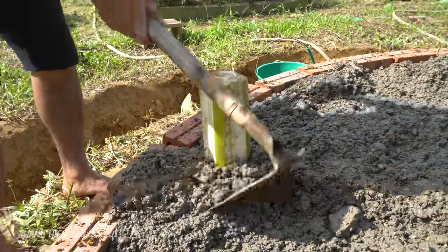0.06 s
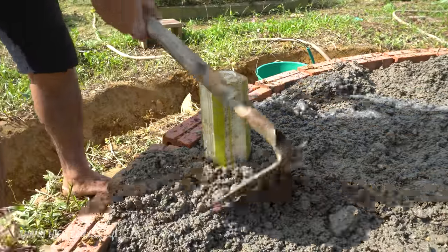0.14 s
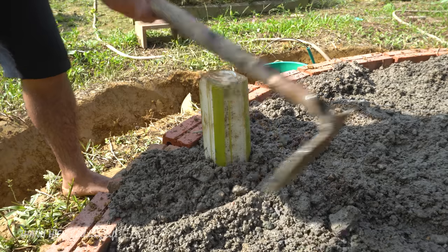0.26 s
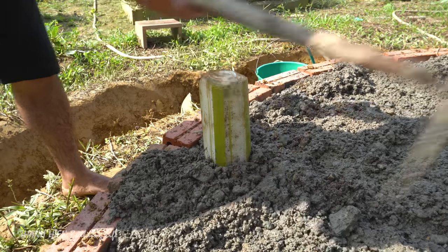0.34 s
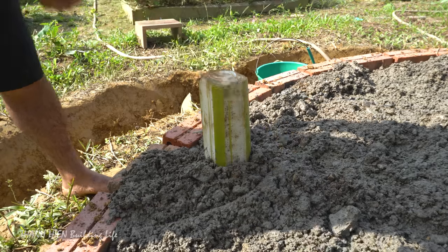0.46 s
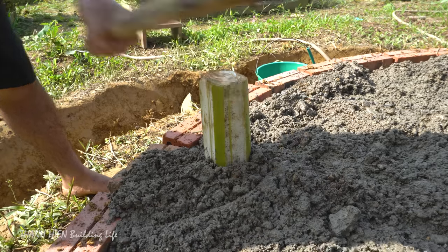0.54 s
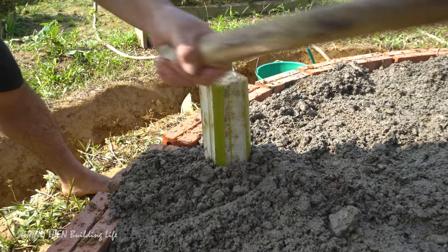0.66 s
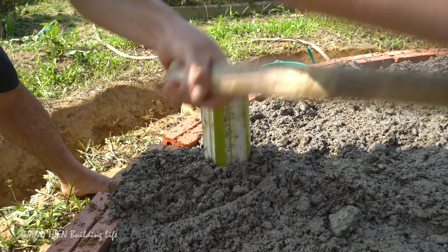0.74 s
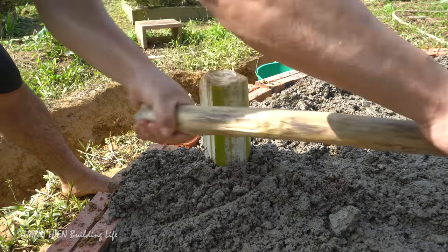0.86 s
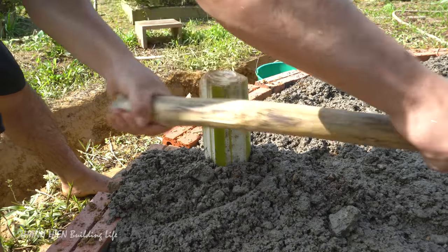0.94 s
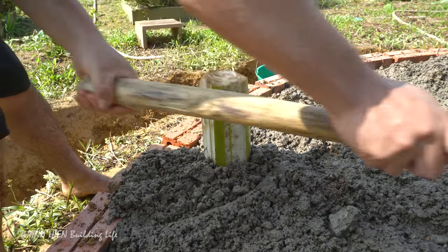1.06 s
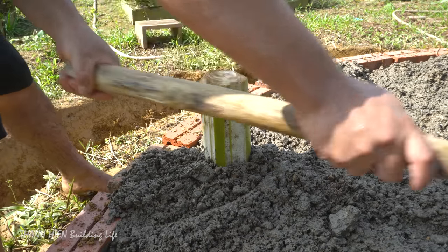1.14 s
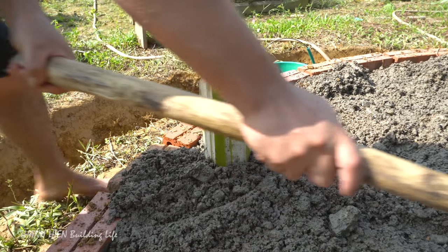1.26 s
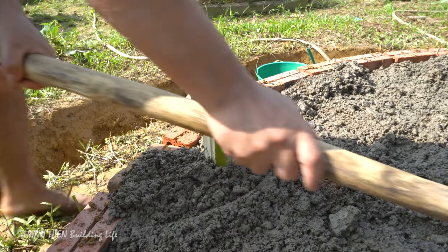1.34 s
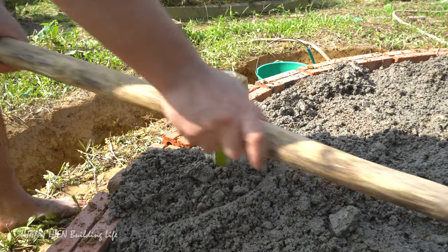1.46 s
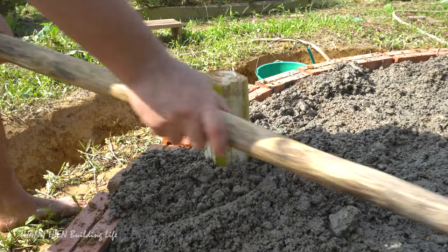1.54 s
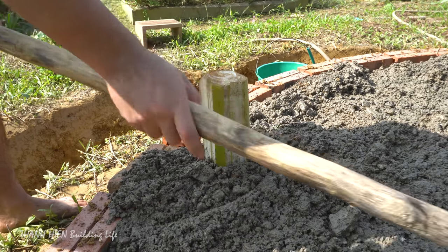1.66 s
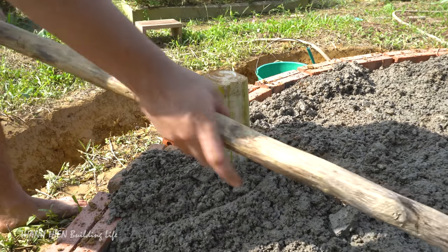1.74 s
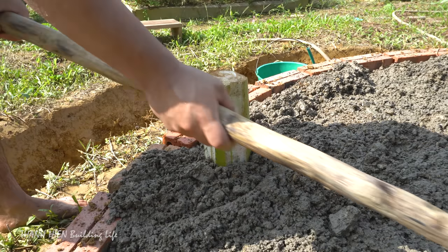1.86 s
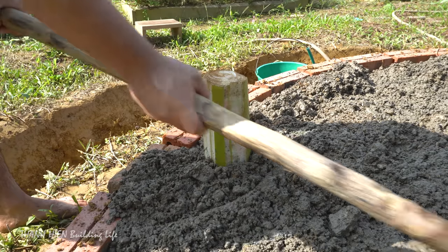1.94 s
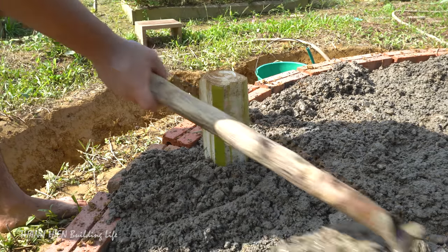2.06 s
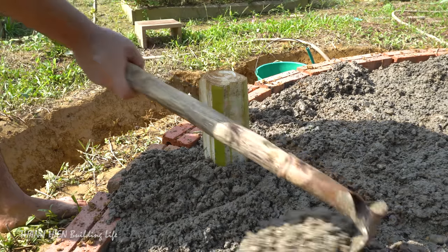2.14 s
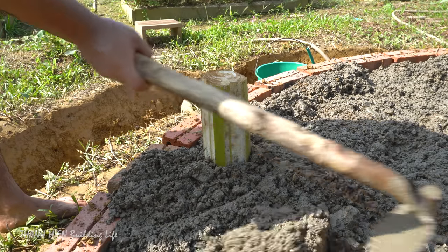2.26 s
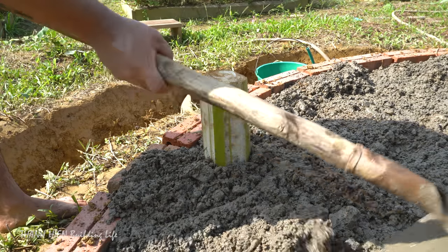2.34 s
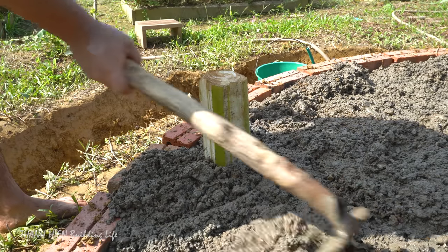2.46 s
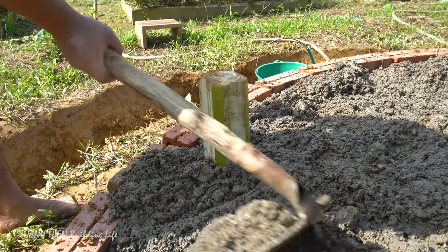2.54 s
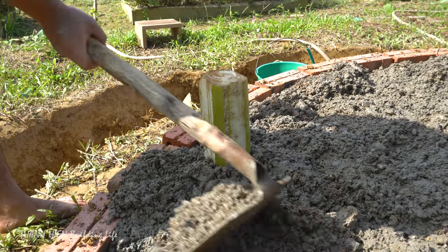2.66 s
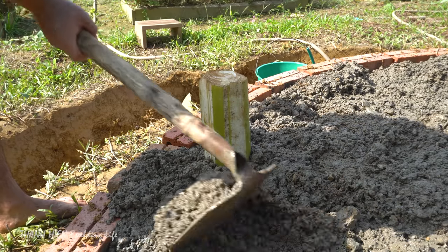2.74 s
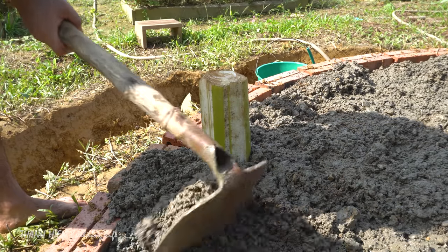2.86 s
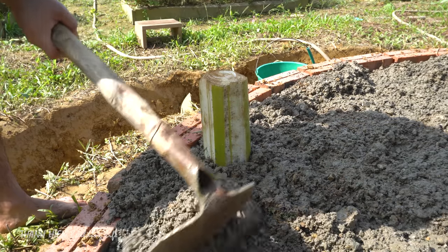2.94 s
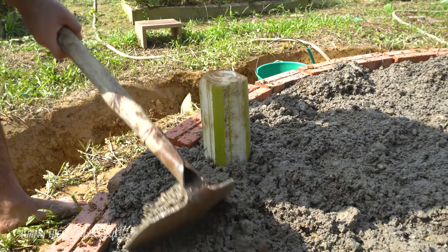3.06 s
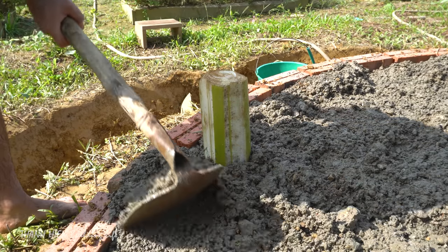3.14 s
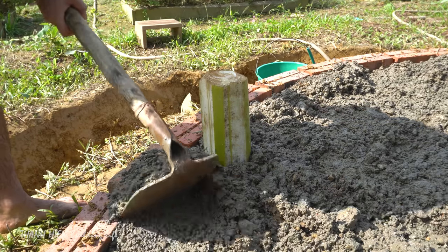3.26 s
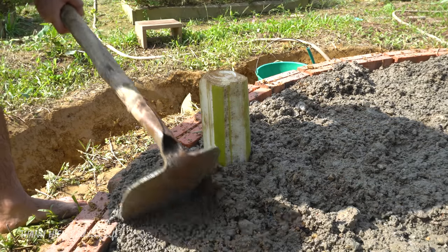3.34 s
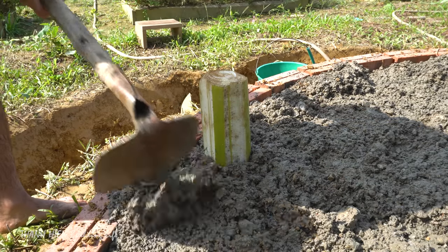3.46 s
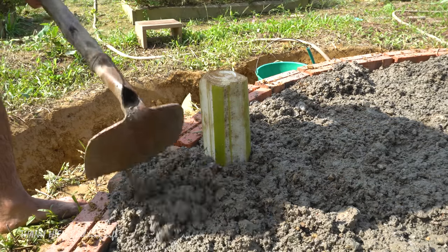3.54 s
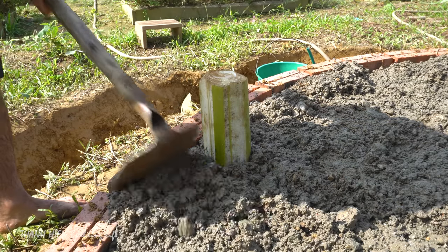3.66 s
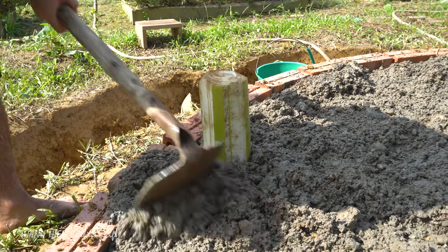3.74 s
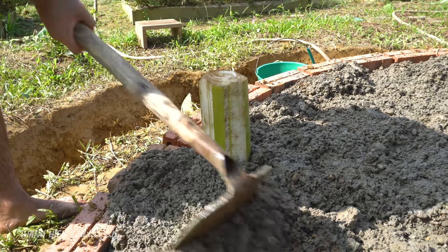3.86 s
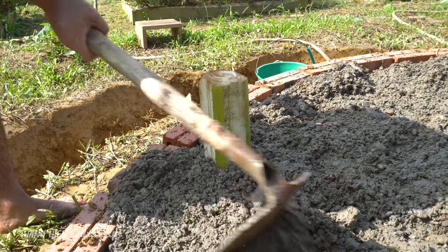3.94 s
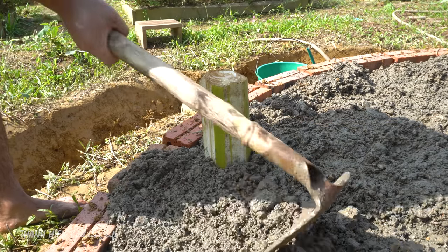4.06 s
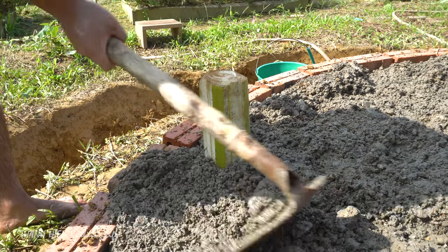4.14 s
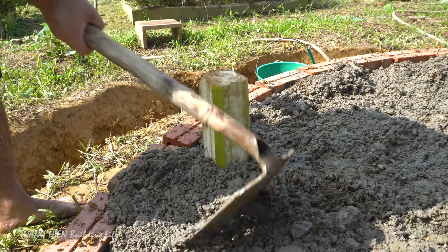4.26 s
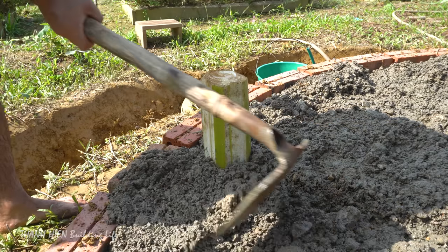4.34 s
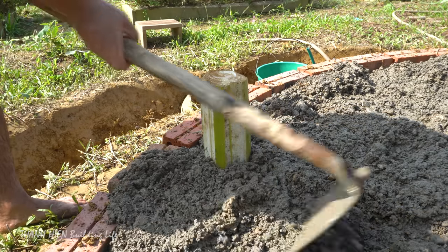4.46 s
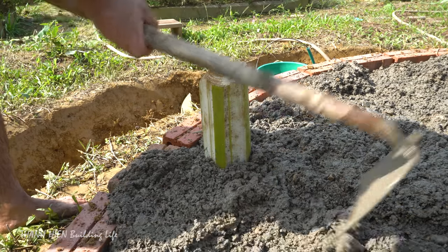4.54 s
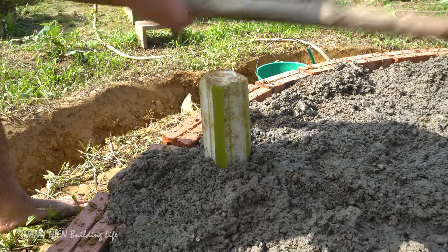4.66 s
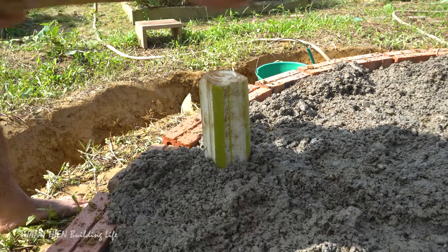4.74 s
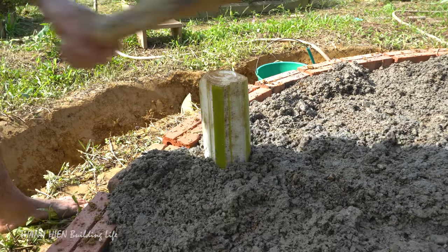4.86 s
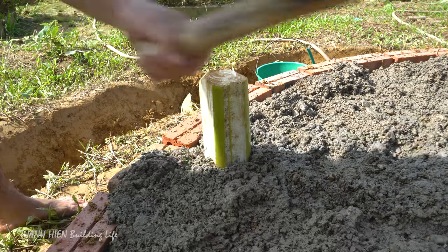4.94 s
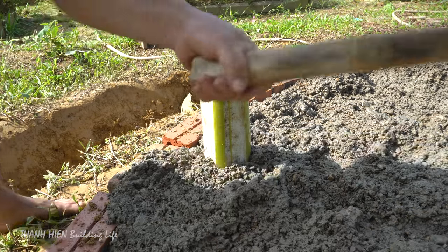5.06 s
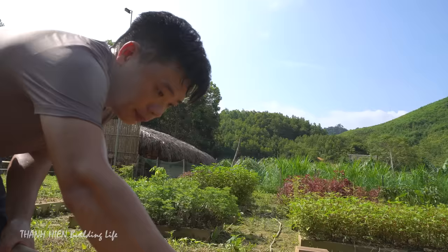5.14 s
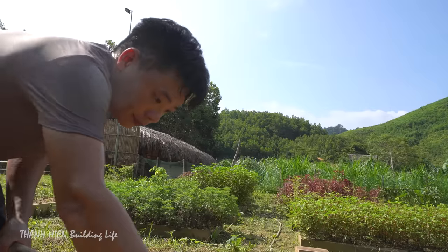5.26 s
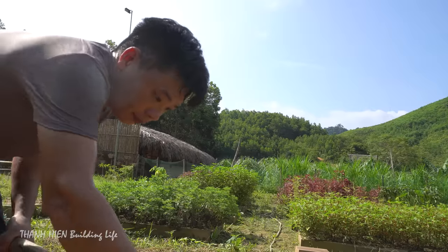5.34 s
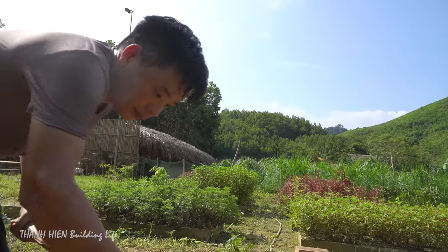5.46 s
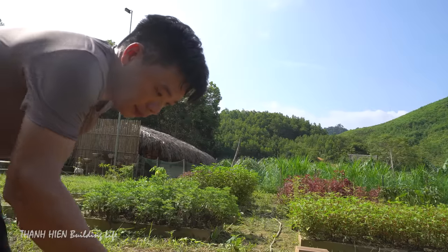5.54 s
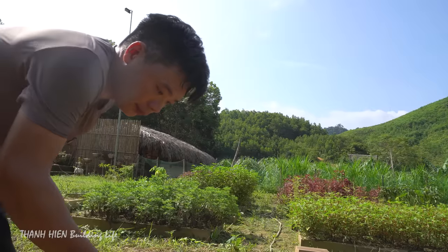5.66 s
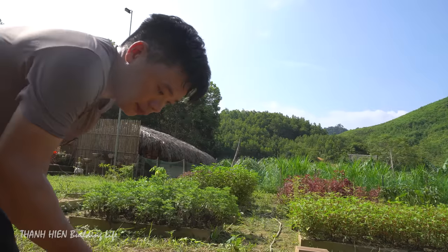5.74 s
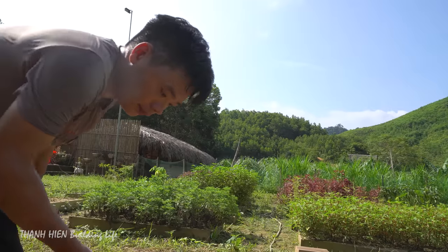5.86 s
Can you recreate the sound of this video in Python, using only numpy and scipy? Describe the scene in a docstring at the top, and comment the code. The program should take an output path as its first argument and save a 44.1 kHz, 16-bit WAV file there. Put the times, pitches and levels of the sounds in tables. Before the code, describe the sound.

A hoe mixes wet sand and cement close to the microphone, outdoors and without echo. At 0.1 s the blade bites with a hard double crunch and stone clatter, easing off by about 0.4 s. In the gap there is soft air, thin high insect shimmer, a tiny rising bird whistle at 0.5 s and a faint distant motor-like whine, strongest near 1.3 s and gone soon after 2 s. From 0.8 s a sharp chop leads into rapid, rough scrapes slightly to the right, with a briefly singing steel edge; they soften into slow drags around 1.4 to 2.4 s. A chop at 2.5 s starts more shoves, with strong gritty scrapes at 3.05 to 3.4 s. A hard bite at 3.75 s trails off. Short scrapes follow at 4.2 s, a double chop with a stone knock at 4.5 s, then quiet. At 5.16 s another sharp chop drags on in hollow, softer scraping to the end.

```python
"""Soft garden air and a distant shrill of insects open the scene; almost at once a steel hoe bites, close by.
It chops into wet sand and cement, each chop a short crunch of grain bursts, and drags the heap along in shoves:
these swell, hold and ease off as random grain slips drive the damped blade modes and the hollow under it.
Stones are filtered noise knocks, rubs sing on one narrow resonance, and clods are low bumps of noise.
Behind lie fluttering noise bands (insects), a wavering far-off whine of three partials and one bird, a gliding sine."""
import sys
import numpy as np
from scipy import signal
from scipy.fft import rfft, irfft, next_fast_len
from scipy.io import wavfile
from scipy.ndimage import uniform_filter1d

SR = 44100
rng = np.random.default_rng(int(sys.argv[2]) if len(sys.argv) > 2 else 0)


def pcm_store(signal):
    """Save signal as 16-bit PCM."""
    levels = np.round(np.clip(np.atleast_2d(signal), -1, 1) * 32767)
    wavfile.write(sys.argv[1], SR, levels.astype(np.int16).T)


N = 259749
TIME = np.arange(N) / SR  # s

# shoves through the mix: start t/s, attack t/s, hold t/s, release t60/s, scrape level/dB,
# then before trim and re scrape: hollow level/dB, weight of the moved mix level/dB; ring re rasp level/dB
SHOVES = [(0.148, 0.026, 0.006, 0.25, -36, -9, -19.5, -1), (0.865, .014, 0.048, 0.21, -22, -4, -25.5, 1.5),
          (0.971, 0.029, .05, .1, -20, 1.5, -17.5, -0.5), (1.061, .02, .075, .12, -19.5, -2.5, -19.5, -2),
          (1.158, .012, .028, 0.31, -22.5, 0, -17.5, -7), (1.213, 0.017, 0.039, 0.21, -28.5, -2, -9.5, -4),
          (1.275, 0.019, 0.031, 0.31, -21.5, 0, -13, -16), (1.336, .025, 0.055, 0.44, -28, -3, -16, -8),
          (1.417, 0.2, 0.086, 0.72, -27.5, -3.5, -16, -12), (1.86, .22, 0.051, .45, -26.5, 3, -13.5, -13),
          (2.16, 0.063, .025, 0.33, -28, -5, -19.5, -4), (2.279, 0.041, .05, .75, -35.5, -13, -28, -19),
          (2.55, 0.038, .14, .5, -28.5, 3, -14, -5), (2.78, 0.048, .07, 0.54, -32.5, -1, -17, -7),
          (2.979, 0.0096, 0.025, .2, -31.5, -14.5, -33, -8),
          (3.049, 0.046, .052, .13, -18, -6, -20.5, -3.5),
          (3.177, 0.043, 0.016, 0.28, -22.5, -1.5, -18.5, 0),
          (3.33, 0.078, 0.015, 0.26, -25.5, -1.5, -14, -1),
          (3.479, 0.051, 0.12, 0.26, -38, -18.5, -30, -17),
          (3.729, .016, .176, .72, -22.5, -3.5, -17.5, -11.5),
          (4.18, .002, .015, 0.12, -34, -13.5, -26, -17), (4.192, .04, .016, .18, -18, -11.5, -24, -15),
          (4.277, 0.033, 0.029, .8, -44, -11, -22, -22), (4.53, .02, .02, .1, -26, -10, -18.5, -21),
          (4.595, 0.022, 0.049, .3, -46.5, -26, -32, -23), (5.185, 0.031, .2, 1.3, -32, 1.5, -9.5, -3),
          (5.421, .17, .08, 0.79, -29.5, -1.5, -11.5, -10), (5.73, 0.11, 0.022, 0.38, -30, -2.5, -11.5, -8)]
# harder shoves catch and give way more: scrape level/dB, jerkiness level/dB
JERKINESS = [(-26.5, 0.85), (-21.5, 1.7)]
# the edge chops in: start t/s, travel t/s, stopping t60/s, scrape level/dB,
# then before trim and re scrape: hollow level/dB, weight level/dB, grit level/dB; ring re rasp level/dB
CHOPS = [(0.1036, 0.014, 0.022, -19.5, -20, -19.5, 0.5, -2),
         (0.1107, 0.023, 0.078, -18, -4, -19.5, -3.5, 1), (0.8106, 0.022, 0.13, -15.5, -3.5, -19, -7, -13),
         (2.5044, 0.058, 0.14, -18, -5.5, -26, -3.5, -10), (3.7521, 0.009, 0.037, -14.5, -26, -33, -5, -16),
         (4.5040, 0.014, 0.02, -15.5, -20, -40, -3, 0),
         (4.5208, 0.02, 0.092, -21.5, -3.5, -21.5, -1.5, -25),
         (5.1603, 0.011, 0.11, -13.5, -2.5, -15.5, -10.5, -10.5),
         (5.187, 0.0079, .015, -19, 0.5, -16, -12, 3)]
# stones knock on the blade: start t/s, level/dB, centre f/Hz, width f/Hz, t60/s, ring re knock level/dB
STONES = [(0.1120, -10, 2170, 3000, 0.054, -16), (0.127, -11, 2610, 2000, 0.019, -13),
          (0.1831, -9, 1840, 1000, 0.023, -2), (0.625, -42, 3000, 4000, .015, -13),
          (0.8739, -5, 1990, 2200, 0.0082, -5), (0.9611, -7.5, 2050, 1500, 0.025, 9),
          (1.195, -14.5, 1330, 400, 0.034, 0), (1.421, -14, 2820, 2390, 0.021, 1),
          (2.506, -5, 4300, 7140, 0.017, -37), (2.626, -14.5, 3000, 4000, 0.022, -2),
          (2.9069, -15.5, 2200, 1100, 0.032, -5), (2.985, -40, 2366, 600, 0.069, -12),
          (3.0405, -8, 5800, 9000, 0.033, -8), (3.1424, -20, 3220, 5000, 0.03, -16),
          (3.1762, -16, 4500, 6000, 0.02, -14), (3.2107, -18, 2200, 3000, 0.025, -4),
          (3.4043, -19, 2020, 3000, 0.063, -3), (3.6103, -20, 3020, 3520, 0.014, -3),
          (3.9306, -17, 3470, 4500, 0.022, -10), (4.151, -24.5, 3840, 2800, 0.023, -18),
          (4.5210, -6, 1310, 1700, 0.02, -10)]
# the edge rubs and keeps one mode singing: start t/s, length t/s, f/Hz, level/dB
RUBS = [(0.104, 0.05, 1924, -20.5), (0.168, 0.033, 1880, -24), (0.22, 0.03, 2470, -43),
        (0.808, 0.15, 1318, -22), (0.989, 0.28, 1340, -26), (1.239, 0.052, 2390, -30),
        (2.879, 0.068, 2300, -30.5), (2.974, 0.047, 2370, -30), (4.011, 0.14, 915, -47),
        (4.181, 0.13, 930, -31), (4.512, 0.031, 580, -30.5), (4.509, 0.064, 917, -27),
        (4.512, 0.096, 1443, -37.5)]
# dull thuds of clods and of the blade in the ground: start t/s, level/dB, f/Hz, t60/s
THUDS = [(2.131, -48, 114, 0.34), (2.2, -26.5, 480, 0.036), (2.506, -36, 150, 0.049),
         (3.743, -23, 424, 0.068), (3.850, -29, 353, 0.13), (5.330, -44, 300, .1),
         (5.385, -32.5, 257, 0.23), (5.66, -29, 563, .08)]
# modes of the blade, damped by the mix: f/Hz, width f/Hz, level before the contact tilt/dB
BLADE_MODES = [(600, 37, 20), (942, 160, 5), (1290, 170, -0.5), (1423, 35, 3), (1740, 77, -7),
               (1921, 83, -1), (2038, 77, -4.5), (2160, 130, -7), (2430, 69, 2), (2686, 41, 4.5),
               (3070, 39, -10), (3530, 39, 6), (3760, 51, -18), (4520, 87, -30), (7560, 340, -9)]
# the hollow under the blade changes size from bite to bite: t/s, resonance f/Hz
HOLLOW_PITCH = [(0.2, 653), (1.1, 1230), (2.0, 990), (2.7, 870), (3.3, 920), (4.1, 1020), (4.6, 950),
                (5.3, 1100), (5.6, 980)]
# tone colour of the wet sand: f/Hz, relative level/dB
SAND_COLOUR = [(47, -53), (80, -15.5), (202, -19.5), (374, -11), (635, 0), (903, -3), (1710, -2),
               (2380, -1.5), (2900, -2.5), (4820, -2.5), (9980, -10), (12200, -16), (15500, -25.5)]
# how far right the blade sits, heard as lateness at the left port: t/s, lag/samples
BEARING = [(0.1, 0.31), (0.8, 3.6), (1.3, 2.4), (1.7, 1.8), (2.1, 0.8), (2.5, 0.31), (3.2, 0.041),
           (4.0, 0.17), (4.5, 0.43), (5.18, 2.1), (5.4, 0.15), (5.8, 0.033)]
# share of the hoe that differs between the ports: f/Hz, level/dB
SCATTER = [(100, -26), (500, -28), (1500, -90), (3000, -26), (6000, -12), (10000, -8.5), (15000, -3)]
# distant insect bands: f/Hz, nominal width f/Hz, level/dB
INSECT_BANDS = [(4790, 510, -52), (5600, 180, -58.5), (7450, 550, -55)]
# the whine swells and dies away: t/s, level before flutter/dB
WHINE_LEVEL = [(0, -75), (0.3, -66), (0.55, -59), (0.8, -56), (1.3, -52), (2.0, -68), (2.4, -100)]
# partials of the whine: multiple of its pitch, relative level/dB
WHINE_PARTIALS = [(1, 3.4), (2, 5.3), (3, 1)]
# tone colour of the garden air: f/Hz, relative level/dB
GARDEN_COLOUR = [(25, 7), (60, -4), (150, -7.5), (300, -4), (500, -0.5), (1400, -1.5), (3000, -4),
                 (6500, -8), (10000, -10.5), (13000, -11), (15500, -23)]
# stereo width of the garden air: f/Hz, side re mid level/dB
GARDEN_SIDE = [(30, -2), (100, -3), (500, -14.5), (2000, -21), (5000, -4), (15000, -3)]

WEIGHT_HZ, HOLLOW_TOP_HZ, GRIT_HZ = 507, 1340, 5260  # where weight, hollow, rasp and grit hand over
SHOVE_RING_HZ, CHOP_RING_HZ = 1985, 2170  # the blade modes favoured by each gesture
SAG_DB_PER_S, SHED_DB_PER_S = 1, 8.5  # while held in, the blade slows and sheds its load
JERKS_PER_S = 160
GRIT_DB, GRIT_SLOPE_DB = -2, 0.5  # grit straight ahead: level re scrape before trim, slope per octave
SHADE_DB, SHADE_SLOPE_DB = 3, 3  # to the side the grit is fainter and duller, per sample of lag
GRIT_LINGER = 0.23  # fine grit trickles on as the blade eases off: dB gained per dB of release
PEBBLES_PER_S, PEBBLE_DB = 60, -18  # small pebbles tick on the blade; level re scrape
HOLLOW_TRIM_DB, WEIGHT_TRIM_DB, GRIT_TRIM_DB = -1.95, 4.5, 0.3
WHINE_HZ = 720
TOP_HZ = 15850


def shoves():
    """Each shove gathers force, holds while the load is shed and eases off, catching and giving way throughout."""
    out = np.zeros(N)
    for start, attack, hold, t60, level_db, hollow_db, weight_db, ring_db in SHOVES:
        t = TIME[:int((attack + hold + t60 / 2) * SR)]
        held = np.clip(t - attack, 0, hold)
        release_db = -60 * np.maximum(t - attack - hold, 0) / t60
        force = np.minimum(t / attack, 1) * undb(release_db + level_db - SAG_DB_PER_S * held)
        load_db = -SHED_DB_PER_S * held

        aside = np.interp(start + t, *np.transpose(BEARING))
        grit_db = GRIT_DB - SHADE_DB * aside - GRIT_LINGER * release_db
        slope_db = GRIT_SLOPE_DB - SHADE_SLOPE_DB * np.average(aside, weights=force)

        jerkiness_db = np.interp(level_db, *np.transpose(JERKINESS))
        jerks = unit(undb(jerkiness_db * walk(JERKS_PER_S, len(t))))
        sand = crunch(start + t, hollow_db + load_db, weight_db + load_db, grit_db,
                      SHOVE_RING_HZ, ring_db, slope_db)
        pebbles = blade(grains(len(t), per_s=PEBBLES_PER_S, spread_db=2.0), SHOVE_RING_HZ)
        add(out, start, force * (jerks * sand + undb(PEBBLE_DB) * pebbles))
    return out


def chops():
    """The edge cuts in at full speed, travels a little and is stopped by the wet mass."""
    out, t = np.zeros(N), TIME[:SR // 4]
    for start, travel, t60, level_db, hollow_db, weight_db, grit_db, ring_db in CHOPS:
        onset = np.minimum(t / 0.00058, 1)
        speed = onset * decay(np.maximum(t - travel, 0), t60)
        jerks = unit(undb(0.42 * walk(350, len(t))))
        sand = crunch(start + t, hollow_db, weight_db, grit_db, CHOP_RING_HZ, ring_db, slope_db=4.0)
        add(out, start, speed * jerks * undb(level_db) * sand)
    return out


def stones():
    """A stone chatters on the blade for a moment; the mix smothers the ring."""
    out, t = np.zeros(N), TIME[:SR // 12]
    for start, level_db, hz, width, t60, ring_db in STONES:
        fade = decay(t, t60)
        chatter = rng.standard_normal(len(t)) * fade
        chatter[0] = 5  # a hard first contact
        knock = cut(resonate(chatter, hz, width), [350, min(2.8 * hz, SR * .42)], "bandpass")
        hit = unit(unit(knock) + undb(ring_db) * blade(chatter, hz))
        energy = np.sqrt(np.mean(fade ** 2))  # longer chatter carries more
        add(out, start, undb(level_db) * energy * hit)
    return out


def rubs():
    """Stick and slip at the edge pump one narrow resonance, which swells and fades."""
    out = np.zeros(N)
    for start, length, hz, level_db in RUBS:
        size = int(length * SR)
        width = np.interp(hz, *np.transpose(BLADE_MODES)[:2])  # as damped as the blade's modes nearby
        noise = rng.standard_normal(size + SR // 20)  # extra lead-in lets the resonance settle
        tone = resonate(resonate(noise, hz, width), hz, width)[-size:]
        swell = np.sin(np.pi * np.arange(size) / size)
        add(out, start, undb(level_db) * unit(tone) * swell)
    return out


def thuds():
    """Soft, heavy lumps land with a short low bump of band-passed noise."""
    out, t = np.zeros(N), TIME[:SR // 3]
    for start, level_db, hz, t60 in THUDS:
        body = unit(cut(rng.standard_normal(len(t)), [hz / 1.14, hz * 1.23], "bandpass"))
        add(out, start, undb(level_db) * body * decay(t, t60))
    return out


def crunch(t, hollow_db, weight_db, grit_db, ring_hz, ring_db, slope_db=0):
    """Wet sand on steel: grains rasp and ring the blade, the hollow resonates, mass shifts, grit crackles."""
    size = len(t)
    rasp = zone(grains(size, per_s=11000, spread_db=2.5), HOLLOW_TOP_HZ, GRIT_HZ)
    ring = blade(grains(size, per_s=3000, spread_db=2.5), ring_hz)
    ring_gain = undb(ring_db)
    # more ring takes room from the rasp
    scrape = (rasp + ring_gain * ring) / np.sqrt(1 + 0.55 * ring_gain ** 2)

    crumbs = grains(size, per_s=6000, spread_db=2.0) + 0.22 * clods(size, per_s=45, ring_q=6.6)
    lumps = zone(crumbs, WEIGHT_HZ, HOLLOW_TOP_HZ)
    hollow_hz = np.interp(t.mean(), *np.transpose(HOLLOW_PITCH))
    hollow = unit(.5 * lumps + resonate(lumps, hollow_hz, width=820))
    weight = zone(crumbs, 143, WEIGHT_HZ)

    crackle = grains(size, per_s=16000, spread_db=0.0) + 0.96 * grains(size, per_s=2500, spread_db=2.5)
    grit = zone(colour(crackle, [(GRIT_HZ, 0), (2 * GRIT_HZ, slope_db)]), GRIT_HZ, SR)
    return (scrape + undb(hollow_db + HOLLOW_TRIM_DB) * hollow
            + undb(weight_db + WEIGHT_TRIM_DB) * weight + undb(grit_db + GRIT_TRIM_DB) * grit)


def blade(x, centre_hz):
    """The steel rings; the place of contact favours the modes around one frequency."""
    ring = np.zeros(len(x))
    for hz, width, db in BLADE_MODES:
        octaves_away = abs(np.log2(hz / centre_hz))
        ring += undb(db - 14.3 * octaves_away) * resonate(x, hz, width)
    return unit(ring)


def clods(size, per_s, ring_q, count=12):
    """Tumbling crumbs of many sizes, each a dull pat at its own pitch."""
    pitches = np.geomspace(200, 1500, count) * rng.uniform(0.921, 1.11, count)
    return unit(sum(resonate(grains(size, per_s, spread_db=1.0), hz, hz / ring_q) for hz in pitches))


def grains(size, per_s, spread_db):
    """Random slips of single grains, as clicks of either sign: many small, a few large."""
    count = max(int(per_s * size / SR), 1)
    place, sign, rarity = rng.random((count, 3)).T
    strength_db = spread_db * np.minimum(-np.log(1 - rarity), 6)
    clicks = np.sign(sign - .5) * undb(strength_db)
    return unit(np.bincount((place * size).astype(int), clicks, size))


def zone(x, low_hz, high_hz):
    """One register of the sand's sound, at rms 1."""
    above = cut(colour(x, SAND_COLOUR), low_hz, "highpass", order=3)
    return unit(cut(above, min(high_hz, SR * .45), "lowpass", order=3))


def ports(direct):
    """Two close ports: a tiny lag adds or takes away the wave's slope; tumbling grains reach them unequally."""
    scatter = colour(direct * walk(500, N), SCATTER)
    side = scatter - curve(BEARING) / 2 * np.gradient(direct)
    return np.array([direct + side, direct - side])


def bird(start, length, from_hz, to_hz, level_db):
    """One faint rising whistle from far away, a gliding sine that swells and fades."""
    out, progress = np.zeros(N), np.linspace(0, 1, int(length * SR))
    phase = 2 * np.pi * np.cumsum(from_hz + (to_hz - from_hz) * progress) / SR
    add(out, start, undb(level_db) * np.sin(np.pi * progress) * np.sin(phase))
    return out


def whine():
    """A thin, slightly wavering far-off whine, perhaps a motor: harmonics of one drifting pitch."""
    pitch = WHINE_HZ * (1 + 0.0031 * walk(14.0, N))
    phase = 2 * np.pi * np.cumsum(pitch) / SR
    tone = unit(sum(undb(db) * np.sin(multiple * phase) for multiple, db in WHINE_PARTIALS))
    return undb(curve(WHINE_LEVEL) + 2 * walk(31, N)) * tone


def insects():
    """A distant chorus: many shrill voices blur into fluttering noise bands, different in each ear."""
    def chorus():
        voices = np.zeros(N)
        for hz, width, db in INSECT_BANDS:
            each = 1.7 * width  # two passes narrow the band again
            band = unit(resonate(resonate(rng.standard_normal(N), hz, each), hz, each))
            voices += band * undb(db + 1.0 * walk(40, N))
        return voices
    return np.array([chorus(), chorus()])


def garden(air_db, rumble_db):
    """Soft outdoor air, shaped noise on a shared breeze, with a low, uneven rumble."""
    mid = unit(colour(rng.standard_normal(N), GARDEN_COLOUR))
    side = colour(unit(colour(rng.standard_normal(N), GARDEN_COLOUR)), GARDEN_SIDE)
    breeze_db = walk(15, N)
    rumble = unit(cut(rng.standard_normal(N), [35, 120], "bandpass"))
    air = undb(air_db + breeze_db) * np.array([mid + side, mid - side])
    return air + undb(rumble_db + 2 * breeze_db) * rumble


def undb(db):
    """Decibels to gain."""
    return 10 ** (np.asarray(db) / 20)


def decay(t, t60):
    """Exponential fade that loses 60 dB in t60 seconds."""
    return undb(-60 * t / t60)


def unit(x):
    """Scale to rms 1."""
    return x / np.sqrt(np.mean(x ** 2) + 1e-18)


def curve(rows):
    """Join (s, value) rows by straight lines."""
    return np.interp(TIME, *np.transpose(rows))


def colour(x, points):
    """Filter by a smooth (Hz, dB) spectrum, joined over log frequency."""
    size = next_fast_len(len(x), True)
    hz, db = np.transpose(points)
    freq = np.maximum(np.fft.rfftfreq(size, 1 / SR), 1)
    gain = undb(np.interp(np.log(freq), np.log(hz), db))
    return irfft(rfft(x, size) * gain, size)[:len(x)]


def resonate(x, hz, width):
    """A two-pole resonance with gain 1 at its centre."""
    q = hz / min(abs(width), SR / 4)
    return signal.lfilter(*signal.iirpeak(hz, q, fs=SR), x)


def cut(x, hz, kind, order=2):
    """Butterworth low-, high- or band-pass."""
    return signal.sosfilt(signal.butter(order, hz, kind, fs=SR, output="sos"), x)


def walk(rate, size):
    """Random levels, one every 1 / rate s, joined by ramps; spread near 1."""
    k = max(int(SR / rate), 1)
    steps = np.repeat(rng.standard_normal(size // k + 1), k)
    return np.sqrt(3 / 2) * uniform_filter1d(steps, k)[:size]


def add(track, start, sound):
    """Mix a sound into a track from the given time on."""
    i = max(int(start * SR), 0)
    track[i:i + len(sound)] += sound[:max(N - i, 0)]


def scene():
    """The hoe close by, the garden around it."""
    hoe = shoves() + chops() + stones() + rubs() + thuds()
    far = insects() + whine() + bird(start=.47, length=0.15, from_hz=3020, to_hz=3420, level_db=-59)
    return ports(hoe) + garden(air_db=-50.0, rumble_db=-65.5) + far


def record(dry):
    """The camera clips any peak beyond full scale and steeply cuts the top."""
    top_cut = signal.ellip(10, .2, 70, TOP_HZ, fs=SR, output="sos")
    return signal.sosfilt(top_cut, np.clip(dry, -1, 1))


dry = scene()
out = record(dry)
pcm_store(out)
```